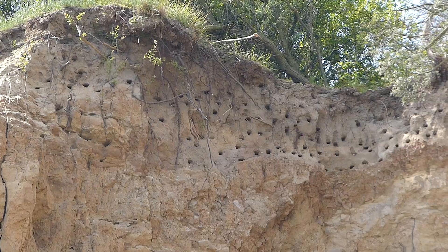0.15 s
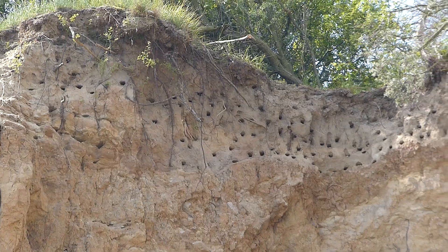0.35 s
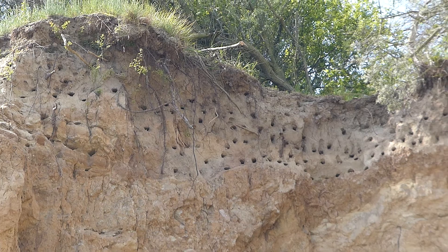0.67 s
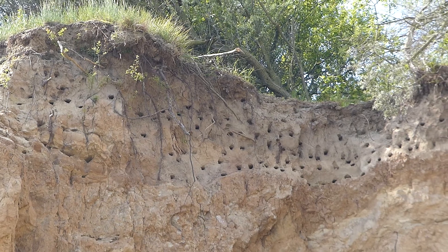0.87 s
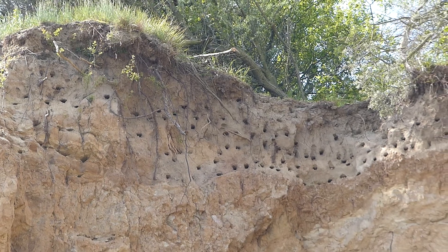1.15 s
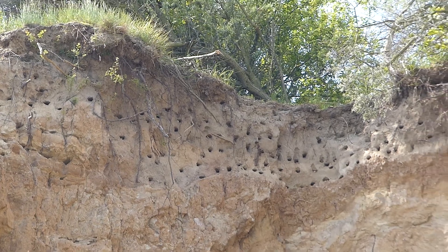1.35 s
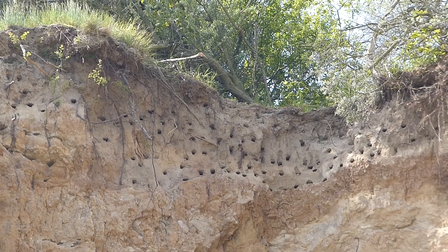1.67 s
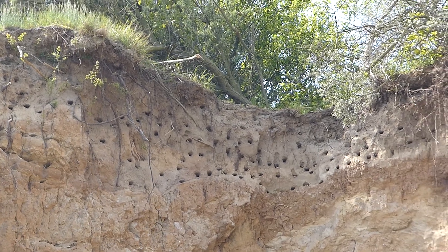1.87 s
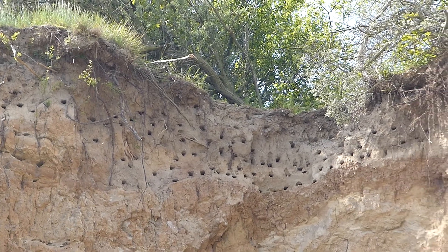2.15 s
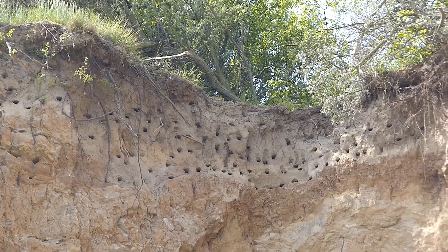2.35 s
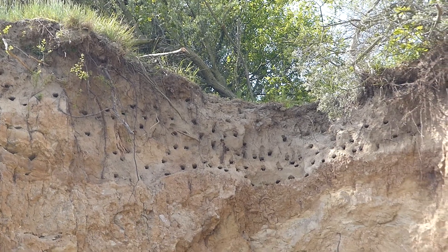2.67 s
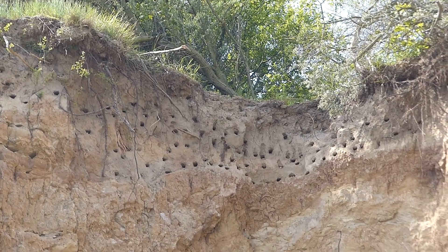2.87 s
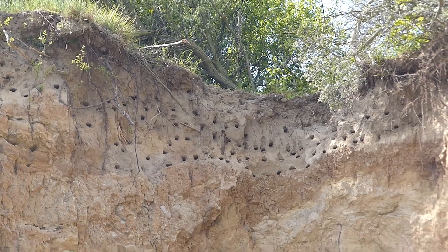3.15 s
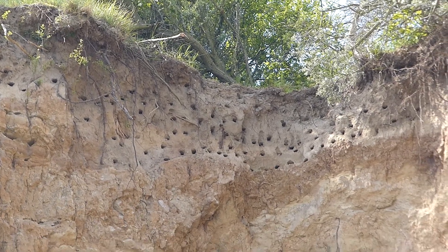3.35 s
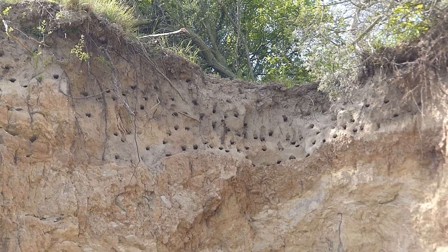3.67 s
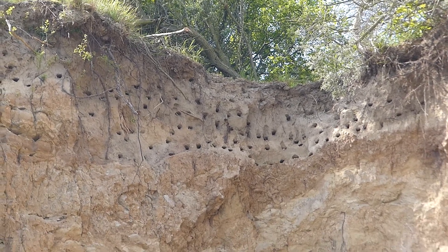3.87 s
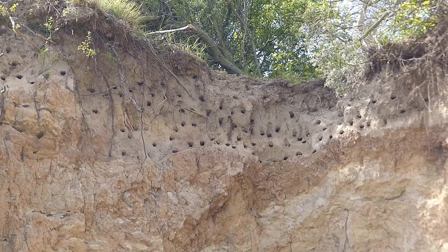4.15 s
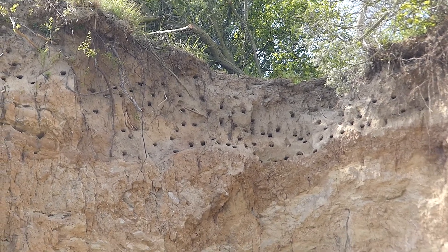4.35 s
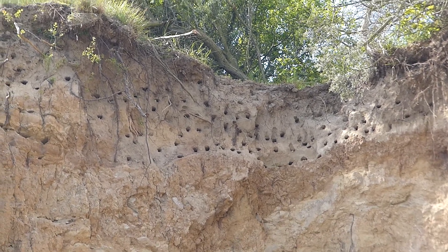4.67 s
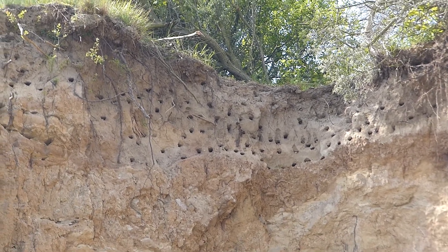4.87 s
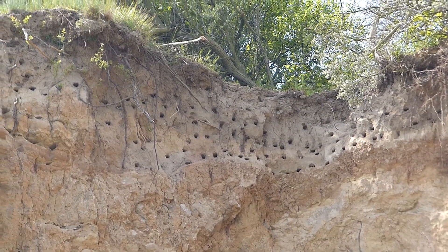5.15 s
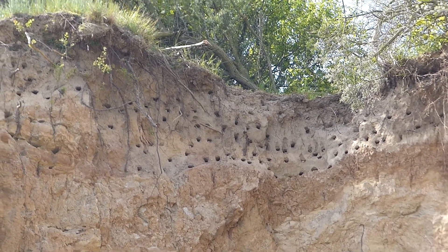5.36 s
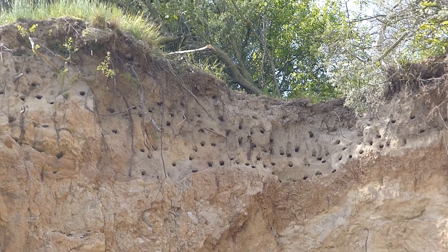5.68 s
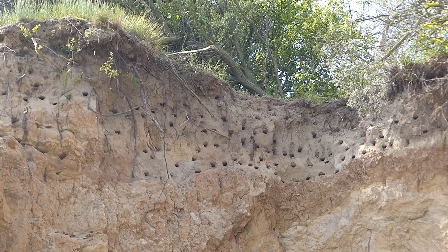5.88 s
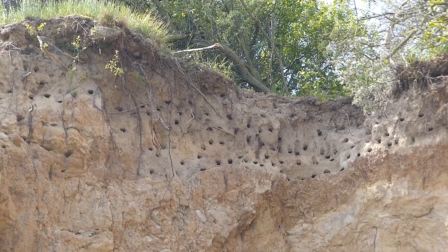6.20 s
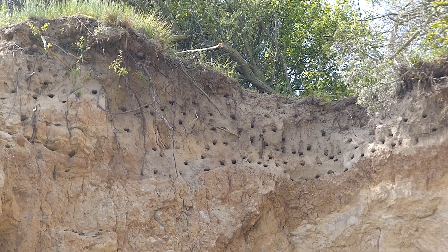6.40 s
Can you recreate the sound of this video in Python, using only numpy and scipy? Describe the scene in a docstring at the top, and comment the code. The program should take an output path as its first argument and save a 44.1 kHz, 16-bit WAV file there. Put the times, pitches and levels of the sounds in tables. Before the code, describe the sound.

A split second of windy shore hiss cuts to silence, then to an open-air sand cliff. Leafy hiss, low wind buffeting and a faint, rapidly pulsing camera motor run beneath. A distant songbird repeats a rising whistle about once a second; others warble hoarsely. Martins give short, dry, buzzy rasps, sparse at first and later almost continuous. A few soft hollow knocks come close to the microphone.

```python
"""A lake shore for a moment, a short silence, then a sand cliff where sand martins rasp at their burrows.
Rasps are trains of tiny falling chirps. A songbird in the trees above repeats a rising call; others
whistle and warble as gliding, buzzing sines. Decaying noise echoes them off the cliff. Shaped noise makes
the air and the wind that buffets two close microphone ports; a small camera motor whirs in pulses of
a sine pair, and decaying modes knock hollowly."""
import sys
import numpy as np
from scipy import signal
from scipy.fft import rfft, irfft, next_fast_len
from scipy.io import wavfile
from scipy.ndimage import map_coordinates

SR = 44100
rng = np.random.default_rng(int(sys.argv[2]) if len(sys.argv) > 2 else 0)


def to_wav(s):
    """Save 16-bit WAV."""
    ch = np.atleast_2d(s).T  # columns
    pcm = np.round(np.clip(ch, -1, 1) * 32767)  # PCM
    wavfile.write(sys.argv[1], SR, pcm.astype(np.int16))


N = 287973
TIME = np.arange(N) / SR
SHORE_END_S, CLIFF_START_S = .122, .322
OPPOSED = np.array([[1], [-1]])  # left and right in opposite sense


def undb(db):
    """Decibels to gain."""
    return 10 ** (np.asarray(db) / 20)


def unit(x):
    """Scale to rms 1."""
    return x / np.sqrt(np.mean(x ** 2))


def colour(x, points):
    """Filter by (Hz, dB) points joined on a log-frequency axis."""
    hz, db = np.transpose(points)
    f_hz = np.maximum(np.fft.rfftfreq(len(x), 1 / SR), 1)
    gain = undb(np.interp(np.log(f_hz), np.log(hz), db))
    return irfft(rfft(x) * gain, len(x))


def noise(points):
    """Coloured noise of rms 1."""
    white = rng.standard_normal(next_fast_len(N))
    return unit(colour(white, points)[:N])


def walk(rate_hz, size=N):
    """A smooth random wander of spread near 1, with rate_hz knots a second."""
    knots = rng.standard_normal(4096)
    return map_coordinates(knots, [np.arange(size) / SR * rate_hz], order=2, mode="wrap")


def add(track, start_s, sound):
    """Mix a sound into a track at a time."""
    i = int(np.clip(start_s * SR, 0, N))
    track[i:i + len(sound)] += sound[:N - i]


def air(spectrum, db, swell_db=0.5):
    """Nearly steady open-air hiss of leaves and distant water: coloured noise, spread by a separate side noise."""
    # Stereo width of the hiss. Each row: frequency in Hz, side minus mid in dB.
    side_points = [(100, -10), (700, 11), (1500, 1), (4500, -4), (8000, -2.5), (15000, -5.5)]
    side = colour(noise(spectrum), side_points)
    gain = undb(db + swell_db * walk(3.12))
    return gain * (noise(spectrum) + OPPOSED * side)


def wind(across_db=16.5, roar_db=-45.5, roar_power=3.54, thump_s=0.02, buffet_db=2.3, buffet_hz=45):
    """Eddies on the ports; their pressure difference drives left and right oppositely; hard gusts roar."""
    # Strength of the wind. Each row: time in seconds, level in dB.
    breeze_points = [(0.36, -56), (0.51, -78), (0.66, -64), (0.78, -56), (0.87, -62), (1.02, -48),
                     (1.11, -52), (2.19, -47.5), (2.35, -51), (2.7, -45.5), (3.06, -51), (3.81, -42),
                     (4.2, -51), (4.29, -43.5), (4.77, -44.5), (5.34, -39.5), (5.7, -34.5), (6.18, -40),
                     (6.48, -39)]
    # Spectrum of the eddies. Each row: frequency in Hz, density in dB per Hz.
    eddy_spectrum = [(30, -54), (60, -15.5), (100, 2.5), (200, 1), (390, -15.5), (730, -31.5),
                     (1600, -69.5)]
    # Filter of the port difference. Each row: frequency in Hz, gain in dB.
    across_points = [(80, -7), (280, 5.5), (1200, 2.5)]
    # Spectrum of fine eddies in the strongest gusts. Each row: frequency in Hz, density in dB per Hz.
    roar_spectrum = [(150, -18.5), (400, 4.5), (650, -11), (1200, -28), (3000, -44.5)]
    # Single eddies thumping on the ports. Each row: centre in seconds, rise over the wind around it in dB.
    buffets = [(.617, 8.5), (.659, 9.5), (0.747, 9), (1.022, 5), (2.54, 7), (4.33, 5), (4.835, 6)]
    breeze = undb(np.interp(TIME, *np.transpose(breeze_points)))
    across = unit(colour(noise(eddy_spectrum), across_points))  # the pressure difference between the two ports
    rumble = breeze * (noise(eddy_spectrum) + OPPOSED * undb(across_db) * across)
    roar = undb(roar_db) * (breeze / breeze.max()) ** roar_power * noise(roar_spectrum)
    thumps_db = sum(db * np.exp(-((TIME - s) / thump_s) ** 2) for s, db in buffets)
    return (rumble + roar) * undb(thumps_db + buffet_db * walk(buffet_hz))


def motor(whine_hz=800, rest_db=-75, side_db=-8):
    """A small camera motor: a nearly even whine, faint at rest, pulses over eight times a second."""
    # Strength of the pulses. Each row: time in seconds, level in dB.
    pulse_points = [(.45, -60.5), (3.2, -57), (6.5, -65.5)]
    period_s, first_s, half_s, ramp_s = .12002, .029, .026, .011
    waver_hz, uneven_db = 12, 1.6
    from_centre_s = np.abs((TIME - first_s + period_s / 2) % period_s - period_s / 2)
    running = np.clip((half_s - from_centre_s) / ramp_s, 0, 1)
    phase = 2 * np.pi * np.cumsum(whine_hz + waver_hz * walk(200)) / SR
    strength = undb(np.interp(TIME, *np.transpose(pulse_points))) * running + undb(rest_db)
    gain = strength * undb(uneven_db * walk(1 / period_s))
    return gain * np.sqrt(2) * (np.sin(phase) + undb(side_db) * OPPOSED * np.cos(phase))


def ticks(t60_s=0.0078, ring_hz=1400, ring_t60_s=0.024, ring_db=-9):
    """Dry close clicks: a decaying noise crack and a brief sine ring."""
    # Each row: start in seconds, level in dB.
    clicks = [(3.122, -42)]
    out, t = np.zeros(N), TIME[:SR // 10]
    grain = noise([(300, -9), (1400, 7), (8000, 2.0), (14000, -26)])[:len(t)]
    crack = undb(-60 * t / t60_s) * grain / 2
    ring = undb(ring_db - 60 * t / ring_t60_s) * np.sin(2 * np.pi * ring_hz * t)
    for s, db in clicks:
        add(out, s, undb(db) * (crack + ring))
    return out


def knocks(push_s=0.0032, echo_s=0.023, echo_db=-8):
    """Soft blows ring the modes of a hollow body, each with one close reflection."""
    # Each row: start in seconds, peak of the direct blow in dB.
    blows = [(.826, -48), (1.389, -49), (3.355, -35), (3.89, -33.5), (4.422, -37)]
    # Modes of the body. Each row: frequency in Hz, level in dB, t60 in seconds.
    modes = [(512, -6, 0.13), (578, 5.5, 0.044), (695, -13, 0.022), (1106, -5.5, 0.029), (1190, -20, 0.031),
             (1630, -17.5, 0.029)]
    out, t = np.zeros(N), np.arange(SR // 6) / SR
    ring = sum(undb(db - 60 * t / t60_s) * np.sin(2 * np.pi * hz * t) for hz, db, t60_s in modes)
    ring = ring * (1 - np.exp(-t / push_s))
    for s, db in blows:
        blow = undb(db) * ring / np.abs(ring).max()
        add(out, s, blow)
        add(out, s + echo_s, undb(echo_db) * blow)
    return out


def cliff(x, wet_db, early_t60_s, tail_db, gap_s=.004, t60_s=1.0, side_db=-9):
    """Dense scatter from the sand face, then a longer tail from the trees, both decaying noise."""
    t = np.arange(SR) / SR
    decay = (undb(-60 * t / early_t60_s) + undb(tail_db - 60 * t / t60_s)) * (t > gap_s)
    tails = decay * rng.standard_normal((2, SR)) / np.sqrt(np.sum(decay ** 2))
    mid, side = (signal.fftconvolve(x, tail)[:N] for tail in tails)
    return x + undb(wet_db) * (mid + undb(side_db) * OPPOSED * side)


def fading_whistle(hz=2369, db=-65, fade_db_per_s=65):
    """The end of a distant pure whistle: a sine dies away on a steady pitch."""
    since_s = np.maximum(TIME - CLIFF_START_S, 0)
    return undb(db - fade_db_per_s * since_s) * np.sin(2 * np.pi * hz * TIME)


def thin_whistle(start_s=3.14, length_s=.58, hz=2900, db=-73.5, waver_hz=110, broken_db=3):
    """A faint, far whistle: a sine wavering randomly in pitch and level."""
    out, size = np.zeros(N), int(length_s * SR)
    phase = 2 * np.pi * np.cumsum(hz + waver_hz * walk(hz / 10, size)) / SR
    gain = undb(db + broken_db * walk(18, size)) * signal.windows.tukey(size)
    add(out, start_s, gain * np.sqrt(2) * np.sin(phase))
    return out


def noisy_notes():
    """Harsh high cries, a hoarse lower note and one breathy puff: a noisy band around a sliding or steady pitch
    swells and fades."""
    # Each row: start in seconds, length in seconds, pitch in Hz, slide in Hz, width in Hz, level in dB.
    bands = [(1.21, 0.081, 7430, 500, 610, -62), (1.261, .07, 7960, 102, 1200, -64),
             (1.3, 0.093, 7100, -500, 1740, -65.5), (2.349, 0.041, 1650, 0, 910, -57),
             (2.618, 0.071, 7400, 600, 1500, -70), (4.058, 0.16, 3300, 107, 702, -64)]
    out = np.zeros(N)
    for s, length_s, hz, slide_hz, width_hz, db in bands:
        size = int(length_s * SR)
        phase = 2 * np.pi * np.cumsum(hz + slide_hz * np.linspace(-.5, .5, size)) / SR
        band = walk(width_hz, size) * np.sin(phase) + walk(width_hz, size) * np.cos(phase)
        add(out, s, undb(db) * np.sqrt(np.hanning(size)) * band)
    return out


def whistle(s, hz, db, hoarse, flutter_hz=600, spread_hz=500):
    """A syrinx tone along pitch and level contours; pushed hard, it flutters in pitch and breaks into a buzz."""
    buzz_hz, buzz_jitter, buzz_depth = 125, .35, 2.1
    t = np.arange(s[0], s[-1], 1 / SR)
    effort = undb(np.interp(t, s, db))
    flutter = 1 - np.minimum(walk(flutter_hz, len(t)) ** 2, 4)  # breaks downward from a clear top edge
    pitch_hz = np.interp(t, s, hz) + hoarse * np.minimum(effort, 1) * spread_hz * flutter
    cycles = np.cumsum(buzz_hz * (1 + buzz_jitter * walk(buzz_hz, len(t)))) / SR
    peak_effort = np.maximum.accumulate(effort)  # once begun, the buzz lasts to the end
    depth = np.minimum(buzz_depth * hoarse * peak_effort ** 2, 1)
    buzz = unit(1 + depth * np.sin(2 * np.pi * cycles))
    gain = effort * buzz * signal.windows.tukey(len(t), .15)
    return np.sqrt(2) * gain * np.sin(2 * np.pi * np.cumsum(pitch_hz) / SR)


def songbirds(edge_db=-5, slur_hoarse=0.175, warble_hoarse=0.26, dive_hoarse=0.15, peep_hz=8500, peep_s=0.069):
    """Syrinx tones: the repeated slur and rising call; other birds' whistles, warble, dives and high peeps."""
    # Rising calls. Each row: crest in seconds, level in dB, level of the lead-in slur in dB, hoarseness 0-1.
    calls = [(0.891, -58.5, -65, 0.26), (1.919, -58, -64.5, 0.34), (2.891, -59, -65, 0.41),
             (3.825, -59, -65, 0.71), (4.748, -60.5, -63.5, 0.41), (5.688, -59, -68, 0.47)]
    # Shape of the rising call. Each row: time from its crest in seconds, pitch in Hz, level in dB.
    call_shape = [(-.17, 2614, -18), (-.1, 2939, -10.5), (-.065, 3187, -5), (-.035, 3527, -6),
                  (-.015, 3800, 0.5), (.005, 3946, 1), (0.049, 3950, -2), (0.088, 3900, -9.5),
                  (.16, 3870, -16)]
    # Thin slur before each call. Each row: time from the crest in seconds, pitch in Hz, level in dB.
    slur_shape = [(-.19, 4565, 1.5), (-.17, 4880, 2), (-.13, 5550, -4), (-.08, 6310, -8)]
    # Level whistles. Each row: start in seconds, length in seconds, pitch in Hz, level in dB, hoarseness 0-1.
    whistles = [(2.128, 0.064, 4035, -59, 0.31), (2.2, 0.039, 4280, -57, 0.13),
                (2.244, 0.044, 4160, -58, 0.07)]
    # One hoarse phrase of quick sliding notes.
    # Each row: start in seconds, length in seconds, pitch in Hz, slide in Hz, level in dB.
    warble = [(2.276, 0.056, 3440, -130, -65.5), (2.33, 0.027, 3710, -450, -61),
              (2.355, 0.026, 3760, 400, -57), (2.407, 0.049, 3120, -150, -65.5),
              (2.48, .04, 3380, 199, -63), (2.512, 0.056, 3660, 351, -58), (2.651, .026, 3655, 452, -58.5),
              (2.672, 0.0364, 3470, -450, -59.5), (2.722, 0.049, 3760, -78, -61.5),
              (2.802, 0.022, 3580, 700, -58.5), (2.831, 0.066, 3410, 148, -62)]
    # Thin whistles that dive in pitch. Each row: start in seconds, level in dB.
    dives = [(3.057, -64), (3.298, -63)]
    # Thin high contact calls. Each row: start in seconds, level in dB.
    peeps = [(2.155, -73), (2.254, -73), (2.48, -77), (3.49, -78), (3.83, -75), (4.04, -72), (4.34, -78),
             (4.8, -74), (5.319, -77)]
    dive_s, dive_hz = 0.085, [6630, 5560, 3600]
    out = np.zeros(N)
    along = np.array([-1, 0, 1])  # start, middle and end of a note

    def note(length_s, hz, db, hoarse):
        """A note through three pitches, loudest in the middle."""
        return undb(db) * whistle(length_s * (along + 1) / 2, hz, edge_db * np.abs(along), hoarse)

    for s, call_db, slur_db, hoarse in calls:
        slur = undb(slur_db) * whistle(*np.transpose(slur_shape), slur_hoarse)
        add(out, s + slur_shape[0][0], slur)
        call = undb(call_db) * whistle(*np.transpose(call_shape), hoarse)
        add(out, s + call_shape[0][0], call)
    for s, length_s, hz, db, hoarse in whistles:
        add(out, s, note(length_s, np.full(len(along), hz), db, hoarse))
    for s, length_s, hz, slide_hz, db in warble:
        add(out, s, note(length_s, hz + slide_hz * along / 2, db, warble_hoarse))
    for s, db in dives:
        add(out, s, note(dive_s, dive_hz, db, dive_hoarse))
    for s, db in peeps:
        pitches_hz = peep_hz + 90 * rng.standard_normal(len(along))
        add(out, s, note(peep_s, pitches_hz, db, warble_hoarse))
    return out


def martins(rasps, scatter_hz, fall_hz, pulse_hz, pulse_s):
    """Each rasp is a train of tiny falling chirps, every one with its own pitch and strength."""
    uneven_db, jitter, haste = 2.4, .24, .17
    out = np.zeros(N)
    u = np.linspace(-1, 1, int(pulse_s * SR))
    for start_s, length_s, centre_hz, db in rasps:
        rasp = np.zeros(SR // 4)
        chance = rng.standard_normal((32, 3))  # columns: timing, pitch, strength
        own_hz = pulse_hz * (1 + haste * rng.uniform(-1, 1))  # each rasp has its own pace
        times_s = (np.cumsum(1 + jitter * chance[:, 0]) - 1) / own_hz
        for s, (_, pitch, strength) in zip(times_s[times_s < length_s], chance):
            hz = centre_hz + scatter_hz * np.tanh(pitch) - fall_hz * u
            chirp = np.hanning(len(u)) ** 2 * np.sin(2 * np.pi * np.cumsum(hz) / SR)
            add(rasp, s, undb(uneven_db * strength) * chirp)
        level = np.sqrt(abs(length_s) * SR / (np.sum(rasp ** 2) + 1e-12))  # rms 1 over the rasp's length
        add(out, start_s, undb(db) * rasp * level)
    return out


def far_martins(low_hz=4120, high_hz=5150, first_db=-78, last_db=-72, length_s=0.09, count=80):
    """Martins further along the cliff: chirp trains on a lower and a higher pitch overlap and grow louder."""
    starts_s = (np.arange(count) + rng.random(count)) / count * TIME[-1]
    pitches_hz = np.resize([low_hz, high_hz], count)
    levels_db = np.interp(starts_s, [0, TIME[-1]], [first_db, last_db])
    rasps = zip(starts_s, np.full(count, length_s), pitches_hz, levels_db)
    return martins(rasps, scatter_hz=212, fall_hz=244, pulse_hz=135, pulse_s=0.006)


def near_martins():
    """Martins at the burrows; the sand face right behind them scatters every chirp into a fine grain."""
    # Rasps. Each row: start in seconds, length in seconds, pitch in Hz, level in dB.
    rasp_rows = [(1.05, 0.075, 4600, -67), (2.12, 0.08, 4900, -66), (2.305, 0.064, 4800, -66),
                 (2.51, .06, 4700, -64.5), (2.655, .015, 5100, -66), (2.7, .07, 4460, -62.5),
                 (2.895, 0.078, 4680, -63.5), (3.24, 0.028, 4870, -63.5), (3.475, 0.056, 4200, -65.5),
                 (3.515, .03, 4970, -62.5), (3.595, 0.059, 4740, -63), (3.735, 0.12, 5030, -62.5),
                 (3.84, 0.083, 5100, -61), (3.91, 0.078, 4860, -66), (4.075, 0.075, 4900, -65),
                 (4.16, 0.063, 5140, -65.5), (4.31, 0.125, 5100, -66.5), (4.495, 0.061, 5200, -66),
                 (4.885, 0.055, 4850, -65), (4.981, 0.028, 5070, -64), (5.027, 0.018, 5200, -61.5),
                 (5.087, 0.059, 5160, -63.5), (5.175, .085, 5000, -67.5), (5.305, .062, 5000, -64),
                 (5.405, 0.065, 5000, -62.5), (5.512, 0.08, 4960, -63), (5.625, 0.092, 5100, -63),
                 (5.82, 0.081, 4950, -66), (5.935, .11, 5180, -62.5), (6.11, 0.051, 4750, -64.5),
                 (6.2, 0.042, 4730, -62), (6.296, 0.065, 4420, -61.5), (6.415, 0.05, 4900, -59.5),
                 (6.512, .03, 4800, -63)]
    # One martin ticking slowly on a lower note.
    # Each row: start in seconds, length in seconds, pitch in Hz, level in dB.
    stutter_rows = [(1.378, 0.048, 4150, -72), (1.466, 0.11, 4170, -71)]
    rasps = martins(rasp_rows, scatter_hz=430, fall_hz=1450, pulse_hz=158, pulse_s=.0028)
    stutters = martins(stutter_rows, scatter_hz=100, fall_hz=400, pulse_hz=72, pulse_s=.005)
    return cliff(rasps + stutters, wet_db=-3, early_t60_s=.025, tail_db=-24, gap_s=.001)


def scene(pan_db=-7.5, hiss_db=-57.5, shore_hiss_db=-54.0, shore_wind_db=-7.5):
    """The shore, a silent gap, then the colony; the same wind runs through both."""
    # Hiss at the cliff. Each row: frequency in Hz, density in dB per Hz.
    cliff_spectrum = [(55, -14), (150, -7), (370, -19.5), (670, -18), (900, -17), (1300, -22.5),
                      (2500, -27.5), (3400, -28.5), (4900, -27), (6500, -32.5), (9500, -34.5),
                      (13300, -40.5), (15500, -44.5)]
    # Hiss at the shore. Each row: frequency in Hz, density in dB per Hz.
    shore_spectrum = [(150, -2.5), (400, -8), (900, -5.5), (1500, -17), (3000, -23.5), (4200, -18.5),
                      (7000, -27.5), (15000, -34.5)]
    far_dry = songbirds() + thin_whistle() + far_martins()
    far = cliff(far_dry, wet_db=-.5, early_t60_s=.6, tail_db=-5)
    near = near_martins() + cliff(noisy_notes(), wet_db=-2, early_t60_s=0.27, tail_db=-16)
    near = near + cliff(knocks(), wet_db=-8, early_t60_s=.1, tail_db=-25, gap_s=.012)
    panned = (far + fading_whistle() + near) * undb(OPPOSED * pan_db / 2)
    colony = panned + ticks() + motor() + air(cliff_spectrum, hiss_db)
    gusts = wind()
    shore = air(shore_spectrum, shore_hiss_db) + undb(shore_wind_db) * gusts
    return (TIME < SHORE_END_S) * shore + (TIME > CLIFF_START_S) * (colony + gusts)


def record(dry, ease_s=2.6, thin_s=2.85, narrow_s=5.4, top_hz=15650):
    """The stereo narrows and the bass thins partway, the width nearly closes near the end; the top is cut off."""
    thin_points = [(70, -18.0), (150, -12.0), (350, -7.5), (800, 0.5)]
    thin = np.array([colour(channel, thin_points) for channel in dry])
    left, right = dry + np.clip((TIME - thin_s) / 0.35, 0, 1) * (thin - dry)
    mid, side = (left + right) / 2, (left - right) / 2
    eased = colour(side, [(400, -10.0), (1200, -9.0), (2500, -6.5)])
    narrow = colour(side, [(300, -55.5), (1500, -17), (5000, -14.5)])
    side = side + np.clip((TIME - ease_s) / 0.067, 0, 1) * (eased - side)
    side = side + np.clip((TIME - narrow_s) / 0.003, 0, 1) * (narrow - side)
    low_pass = signal.ellip(10, .2, 70, top_hz, fs=SR, output="sos")
    return signal.sosfilt(low_pass, mid + OPPOSED * side)


dry = scene()
out = record(dry)
to_wav(out)
```